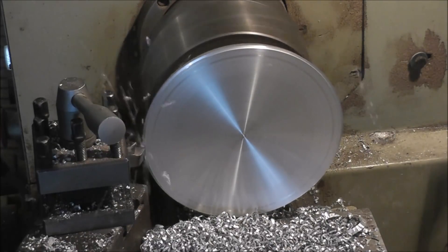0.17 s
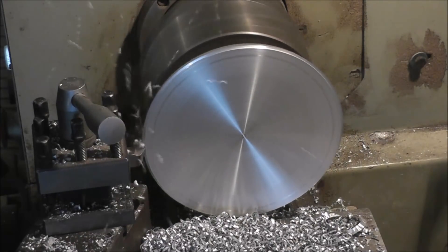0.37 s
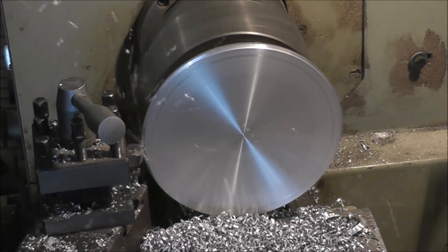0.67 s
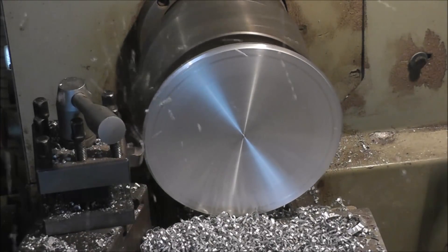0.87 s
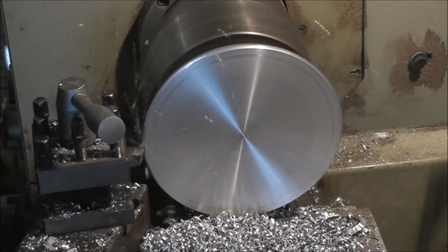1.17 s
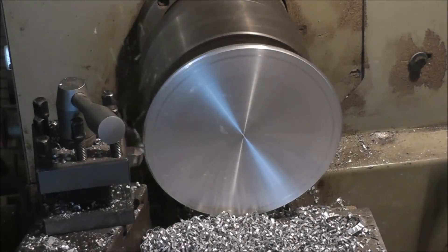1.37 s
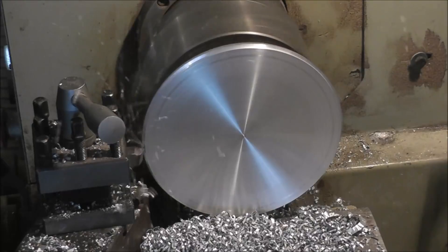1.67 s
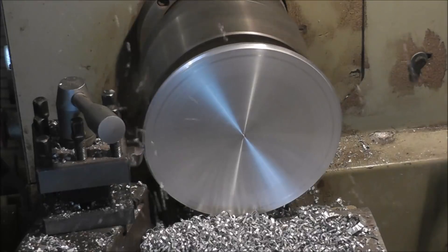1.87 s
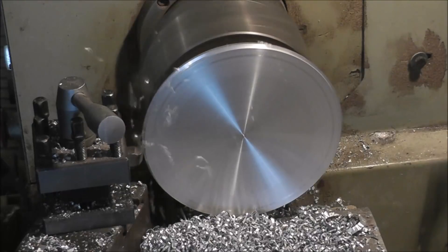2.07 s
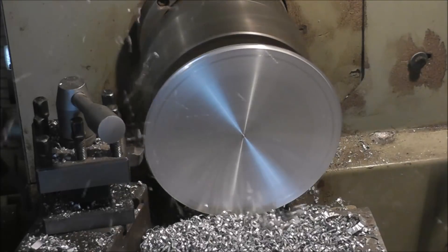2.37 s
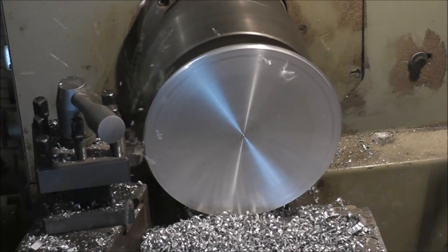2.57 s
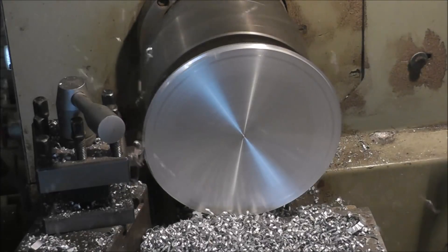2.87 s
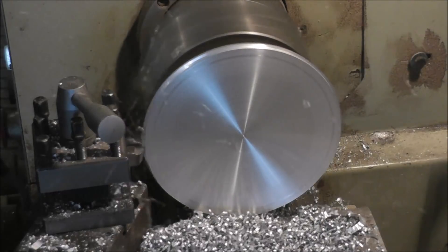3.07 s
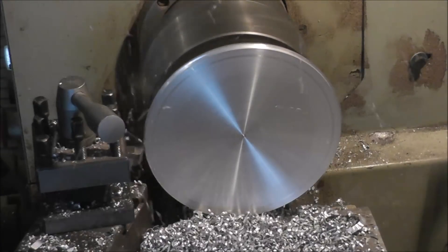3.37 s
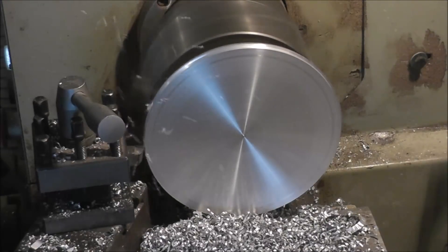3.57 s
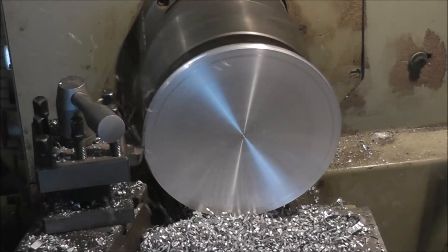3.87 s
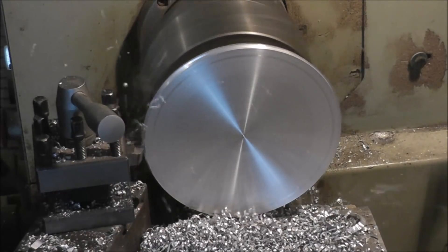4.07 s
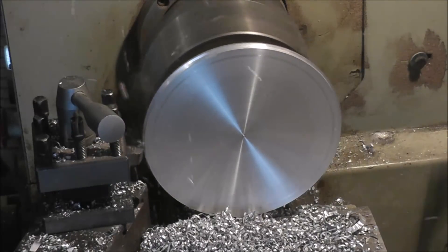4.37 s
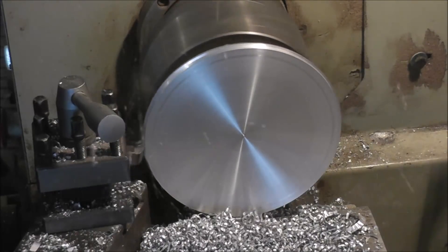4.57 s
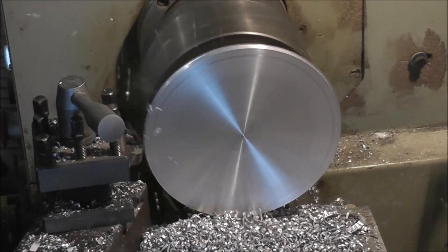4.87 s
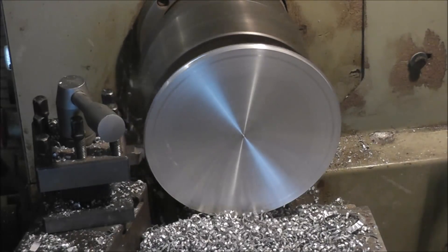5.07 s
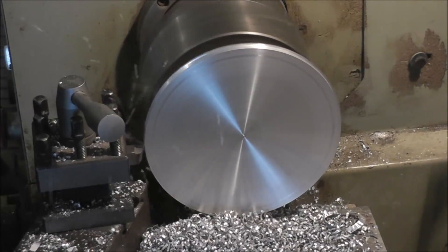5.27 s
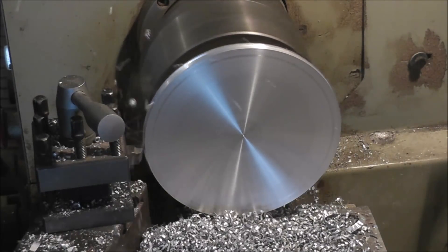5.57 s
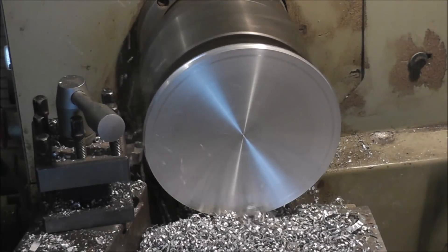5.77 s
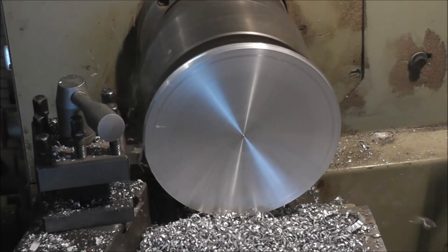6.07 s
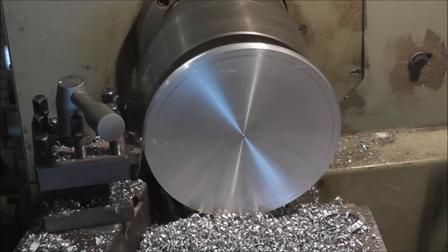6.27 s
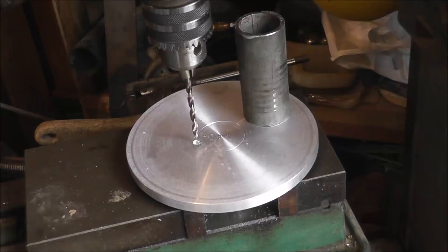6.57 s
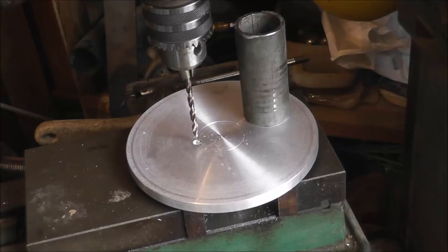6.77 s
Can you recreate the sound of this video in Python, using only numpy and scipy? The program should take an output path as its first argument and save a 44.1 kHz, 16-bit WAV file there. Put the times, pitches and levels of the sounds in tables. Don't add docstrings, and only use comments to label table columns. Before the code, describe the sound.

A metal lathe facing a spinning disc squeals steadily at a high pitch over harsh pulsing hiss and gear rattle, then cuts off abruptly.

```python
import sys
import numpy as np
from scipy import signal
from scipy.io import wavfile
from scipy.ndimage import uniform_filter1d, map_coordinates

SR = 44100
rng = np.random.default_rng(int(sys.argv[2]) if len(sys.argv) > 2 else 0)


def gain_from_decibels(decibels):
    exponent = np.asarray(decibels, float) / 20
    return 10 ** exponent


def pcm_store(signal):
    levels = np.round(np.clip(np.atleast_2d(signal), -1, 1) * 32767)
    wavfile.write(sys.argv[1], SR, levels.astype(np.int16).T)


N = 304731


def unit(x):
    return x / np.sqrt(np.mean(np.abs(x) ** 2) + 1e-20)


def along(points, hz):
    f, v = np.transpose(points)
    return np.interp(np.log(hz + 1), np.log(f + 1), v)


def curves(rows, t):
    s, *cols = np.transpose(rows)
    return [np.interp(t, s, c) for c in cols]


def ring(hz, centre_hz, width_hz, db):
    detuning = (hz * hz - centre_hz ** 2) / (hz * width_hz + 1e-9)
    once = 1 / (1 + np.square(detuning))
    return gain_from_decibels(2 * db) * once * once * once


def per_hz(power):
    return power / power.mean(axis=0)


# frequency in Hz, likeness from 0 to 1.
EAR_LIKENESS = [(60, 0.31), (130, 0.17), (290, 0.98), (640, 0.72), (1410, 0.73), (3100, 0.99), (6820, 0.98),
                (12500, 0.95), (14000, 0.41)]
# frequency in Hz, left over right in dB.
EAR_LEAN = [(60, 8.5), (110, -7), (200, -4), (380, -10), (700, -5.5), (1290, -3.5), (2380, -1),
            (4400, -1.5), (8120, 0.4), (15000, 3.5)]
# frequency in Hz, phase in radians.
EAR_LEAD = [(0, 0), (260, -0.1), (690, 0.45), (1460, 0.25), (1720, 0.91), (1980, -0.31), (2580, -0.32),
            (3010, -0.26), (6200, 0.48), (7150, 0.28), (7840, -0.0), (13400, -0.44), (13900, -0.0),
            (15200, 0.0)]


def shaped(pair, power):
    hz, t, z = signal.stft(pair, SR, nperseg=4096, noverlap=2560)
    hz = hz[:, None]
    turn = np.arccos(np.clip(along(EAR_LIKENESS, hz), 0, 1)) / 2
    mid = z[0] * np.cos(turn)
    side = z[1] * np.sin(turn)
    lean = gain_from_decibels(along(EAR_LEAN, hz) / 2) * np.exp(.5j * along(EAR_LEAD, hz))
    ears = np.array([(mid + side) * lean, (mid - side) / lean])
    ears = ears * np.sqrt(power(hz, t))
    return signal.istft(ears, SR, nperseg=4096, noverlap=2560)[1][:, :N]


# time in seconds, shared level in dB.
SHARED_LEVEL = [(0, -13.5), (.45, -13), (.8, -15), (1.2, -14), (1.9, -13.5), (2.4, -13), (2.8, -14),
                (3.3, -12.5), (3.6, -14.5), (4.1, -12.5), (4.4, -12), (4.7, -12.5), (5.15, -12),
                (5.5, -15.5), (5.9, -13), (6.15, -14), (6.5, -13.5)]


def mean_shared_db():
    return np.mean(SHARED_LEVEL, axis=0)[1]


def level_db(t, start_db, drift_db, follows):
    swing_db = curves(SHARED_LEVEL, t)[0] - mean_shared_db()
    return start_db + drift_db * t + follows * swing_db


# frequency in Hz, width in Hz, level in dB.
GEAR_MODES = [(238.5, 30, 0), (365, 60, -3), (424, 14, 1), (466, 16, 1), (486, 10, -1), (536, 18, -3),
              (583, 26, -13.5), (695, 12, 5), (731, 22, -1), (963, 26, -2.5), (926, 22, -10.5),
              (1092, 18, -3), (1205, 15, -10)]
# frequency in Hz, level per Hz in dB.
CASING_RUMBLE = [(15, -83), (25, -61.5), (113, -5), (170, -9.5), (233, -15), (294, -34), (376, 3),
                 (639, -1.5), (705, -2), (1300, -1.5), (1690, -34), (2860, -120)]
# frequency in Hz, level in dB.
MOTOR_HUM = [(120, 0), (240, 6), (1090, 4)]


def drive():
    drive_follows = .8

    def gear_power(hz, t):
        peaks = per_hz(sum(ring(hz, c, 1.54 * w, db) for c, w, db in GEAR_MODES))
        rumble = gain_from_decibels(-10.0) * per_hz(gain_from_decibels(2 * along(CASING_RUMBLE, hz)))
        return (peaks + rumble) * gain_from_decibels(2 * level_db(t, -23, -0.62, drive_follows) - 1.5)

    t = np.arange(N) / SR
    hum = 0
    for hz, db in MOTOR_HUM:
        ears_db = along(EAR_LEAN, hz) * np.array([[.5], [-.5]])
        hum = hum + gain_from_decibels(db + ears_db) * np.sin(2 * np.pi * hz * t)
    rattle = shaped(rng.standard_normal((2, N)), gear_power)
    return rattle + np.sqrt(2) * gain_from_decibels(level_db(t, -40.5, -1.8, drive_follows)) * hum


def remembered(angle, size, keep):
    fresh = rng.standard_normal((2, int(angle[-1]) + 12, size))
    turns = signal.lfilter([1], [1, -np.clip(keep, 0, .98)], fresh, axis=1)[:, 10:]
    return unit(np.array([map_coordinates(r.ravel(), [angle * size]) for r in turns]))


# time in seconds, turns a second, share of the cut that repeats
# each turn from 0 to 1, depth of the light spot in dB.
SPINDLE_TURNING = [
    (0, 14.97, .5, 1.5),
    (2, 15.1, .35, 2),
    (3.3, 15.17, .4, 3),
    (4, 15.23, .75, 4),
    (4.6, 15.26, .8, 6),
    (5, 15.28, .8, 9),
    (5.5, 15.28, .8, 9),
    (6.5, 15.29, .8, 10),
]
FACE_LOAD = [(0, 0), (.08, .1), (.22, .65), (.4, 1), (.52, .75), (.64, .45), (.8, .85), (.92, .45), (1, 0)]


def chip_force(hard_db, grit_db, chatter, sustain):
    speed, share, light_db = curves(SPINDLE_TURNING, np.arange(N) / SR)
    angle = np.cumsum(speed) / SR
    repeating = np.sqrt(share) * remembered(angle, size=2940, keep=0.922)
    force = repeating + np.sqrt(1 - share) * rng.standard_normal((2, N))

    light_spot = angle[round(6.2 * SR)]
    load = np.interp((angle - light_spot) % 1, *np.transpose(FACE_LOAD))
    hard_spots = remembered(angle, size=10, keep=0.97)[0]
    grit = remembered(angle, size=60, keep=1.0)[1]

    forces = []
    for depth in (1, chatter, sustain):
        swing = gain_from_decibels(depth * light_db * load + hard_db * hard_spots + grit_db * grit)
        forces.append(force * swing / np.sqrt(uniform_filter1d(swing ** 2, SR // 4)))
    return forces


# frequency in Hz, width in Hz, level in dB, climb over the cut in percent.
LOW_MODES = [(1365, 114, 3.5, 4), (1500, 127, 1.5, 1.1), (1614, 73, -5.5, 6), (1745, 95, -5.5, 3.2),
             (1898, 67, -11.5, -3), (1997, 97, -7.5, -1)]
TOOL_MODES = [(2357, 227, 3.5, 2.5), (2370, 200, -13, -4), (2522, 160, 4, -0.5), (2685, 97, -3.5, 4),
              (3060, 330, -11.5, -3.5), (3342, 340, -7.5, -0.5), (3960, 85, -9, -6), (4513, 240, -8.5, 0.7),
              (5210, 360, -17, -1), (5710, 170, -20, 0.5)]
SQUEAL_MODES = [(4180, 47, -6.5, 1), (4130.5, 64, 2.5, 0.81), (4150, 220, -4.5, 0.8), (4259, 110, -5, 0.12)]
HIGH_MODES = [(6190, 750, -23.5, 0.5), (6610, 490, -8.5, 3), (6844, 228, 1, 2), (7130, 150, -18.5, 4.5),
              (8150, 500, -34, 2.5), (9230, 810, -24.5, 2.5), (10024, 140, -10, 2.2),
              (10284, 370, -17, -0.5), (11080, 390, -43, 3.5), (12040, 410, -36.5, 0.5),
              (13000, 900, -30.5, 2.5), (13950, 160, -21, 2.5), (14400, 450, -31.5, -1.5),
              (15250, 900, -31, 0)]
# level against the cut at the start in dB, drift in dB a second, # how
# strongly it follows the shared swing in dB per dB.
FAMILY_LEVELS = [
    (-11.5, -.5, 0.66),
    (-8.5, -0.37, 1.1),
    (-4.5, 0.29, 0.64),
    (-9.5, -0.07, 1.7),
]
# frequency in Hz, level per Hz in dB.
TEARING_HISS = [(290, -31), (500, -10.5), (1170, -22.5), (1430, -6), (2130, -7), (2430, -12.5),
                (3680, -9.5), (4190, -5), (4910, -15.5), (6000, -17.5), (6830, -6.5), (7780, -22),
                (10400, -21.5), (14400, -36.5), (15500, -72.5)]


def cut():
    low, middle, squeal, high = FAMILY_LEVELS

    def gain(t, rule):
        return gain_from_decibels(2 * (mean_shared_db() + level_db(t, *rule)))

    def family(modes, rule, hz, t):
        travel = np.clip(t / 6.5, 0, 1) / 100
        peaks = sum(ring(hz, c * (1 + climb * travel), w, db) for c, w, db, climb in modes)
        return per_hz(peaks) * gain(t, rule)

    def hiss(hz, t):
        return per_hz(gain_from_decibels(2 * along(TEARING_HISS, hz))) * gain(t, (-12.7, -0.56, 1))

    def tool(hz, t):
        return family(TOOL_MODES, middle, hz, t)

    def disc(hz, t):
        low_and_squeal = family(LOW_MODES, low, hz, t) + family(SQUEAL_MODES, squeal, hz, t)
        return low_and_squeal + family(HIGH_MODES, high, hz, t)

    tearing, chattering, ringing = chip_force(hard_db=.4, grit_db=.8, chatter=1.45, sustain=.6)
    return shaped(tearing, hiss) + shaped(chattering, tool) + shaped(ringing, disc)


def scene():
    return drive() + cut()


def roll_off(x):
    return signal.sosfilt(signal.butter(12, 15690, fs=SR, output="sos"), x)


# time in seconds, gain in dB.
SUDDEN_END = [
    (6.5011, 0),
    (6.5014, -120),
]


def record(dry):
    shaved = np.clip(dry, -.9, .9)
    finished = shaved * gain_from_decibels(curves(SUDDEN_END, np.arange(N) / SR)[0])
    return roll_off(finished)


dry = scene()
out = record(dry)
pcm_store(out)
```